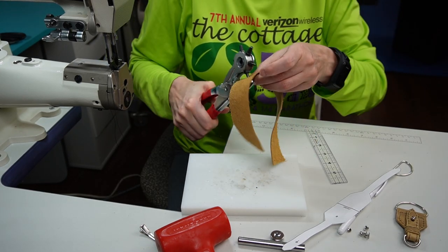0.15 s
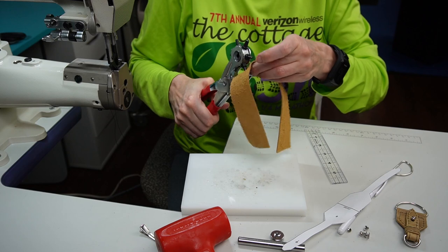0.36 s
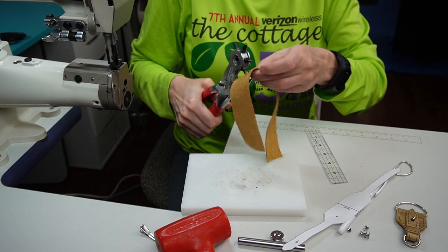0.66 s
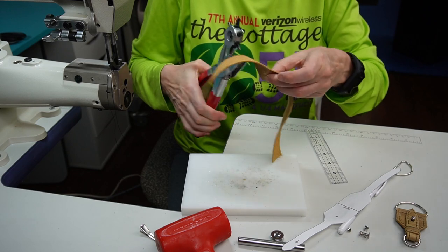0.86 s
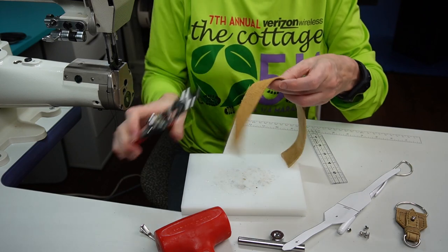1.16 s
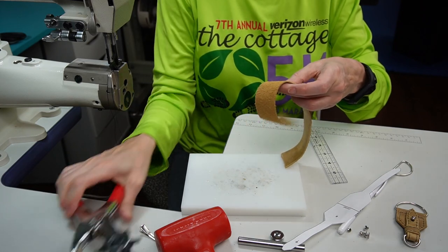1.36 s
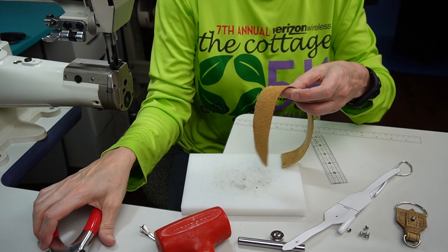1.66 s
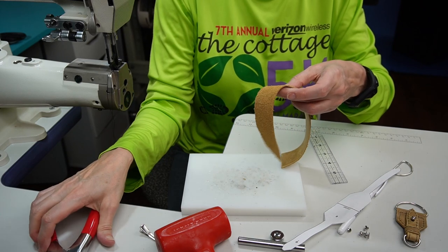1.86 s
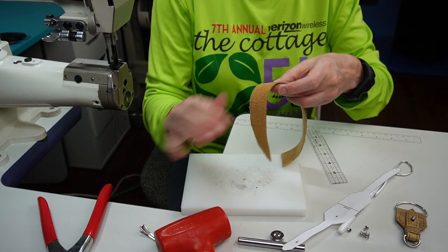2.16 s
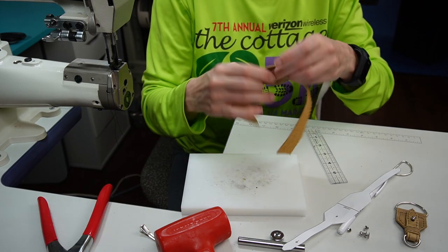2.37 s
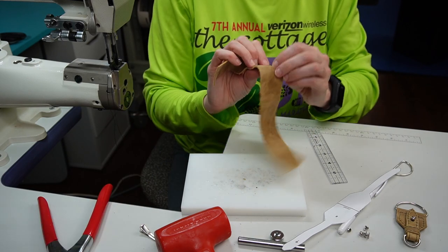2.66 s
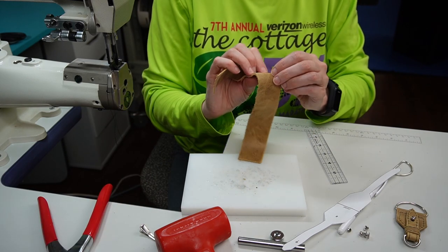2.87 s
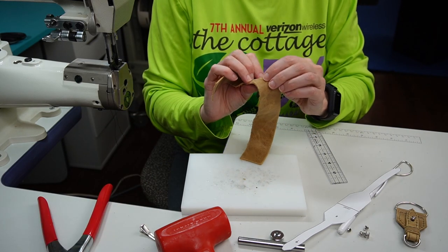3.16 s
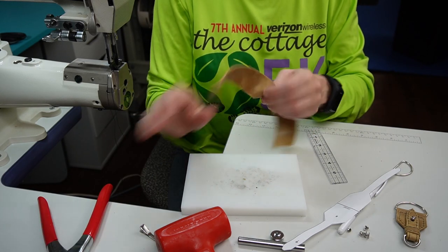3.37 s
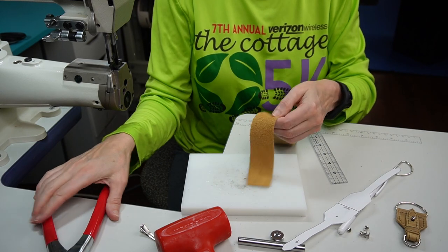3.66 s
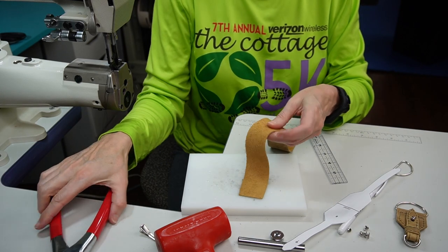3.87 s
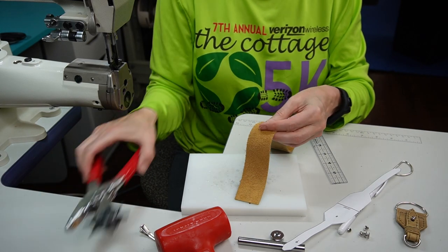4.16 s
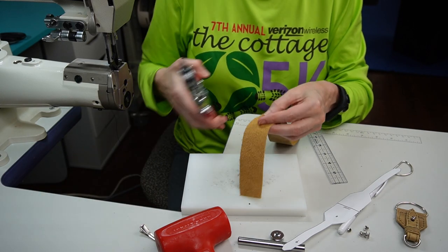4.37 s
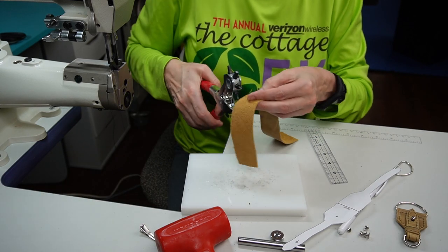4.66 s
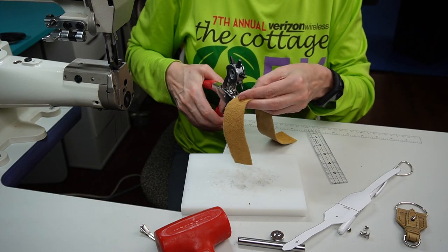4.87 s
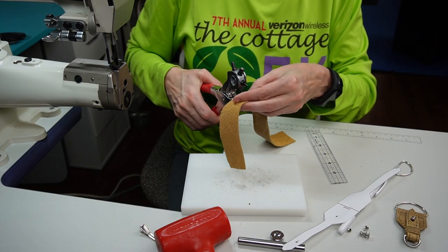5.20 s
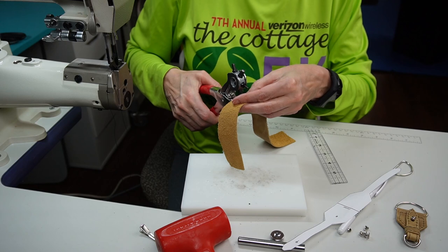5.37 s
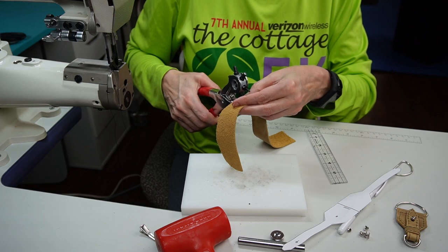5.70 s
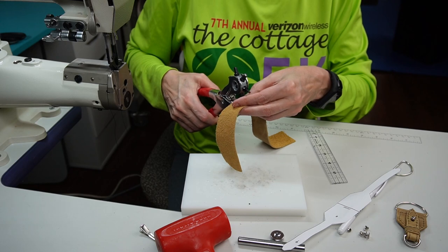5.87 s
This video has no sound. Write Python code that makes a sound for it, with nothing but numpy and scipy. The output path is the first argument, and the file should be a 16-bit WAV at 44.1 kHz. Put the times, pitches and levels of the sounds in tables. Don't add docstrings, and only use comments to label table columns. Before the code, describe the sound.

Steel punch pliers click free of leather, clatter down hard onto a tabletop, then after soft brushing are picked up and snap onto the strap.

```python
import sys
import numpy as np
from scipy import signal
from scipy.fft import rfft, irfft, next_fast_len
from scipy.io import wavfile

SR = 44100
rng = np.random.default_rng(int(sys.argv[2]) if len(sys.argv) > 2 else 0)


def voltage_ratio(decibels):
    exponent = np.asarray(decibels, float) / 20
    return 10 ** exponent


def dump(signal):
    limited = np.clip(np.atleast_2d(signal).T, -1, 1)
    pcm = np.round(limited * 32767).astype(np.int16)
    wavfile.write(sys.argv[1], SR, pcm)


N = 266187

# (frequency [Hz], density [dB per Hz])
AIR_COLOUR = [(13, -57), (22, -21.5), (116, -8), (141, -3), (213, -0.5), (266, -6.5), (381, -7.5), (463, -10),
              (1290, -15), (2370, -17), (2960, -18.5), (15200, -34), (16500, -43)]
# (time [s], level [dB])
DRAUGHT = [(0.0, -68.5), (0.57, -65.5), (1.11, -68), (2.2, -64), (2.82, -66.5), (4.89, -65.5), (5.61, -69),
           (6.04, -67)]
# (frequency [Hz], likeness [0-1])
AIR_ALIKE = [(60, 0.855), (180, 0.88), (550, 0.62), (1650, 0.53), (4970, 0.36), (15000, 0.029)]

# (frequency [Hz], t60 [s])
WALLS_T60 = [(100, 0.87), (400, 0.45), (2000, 0.53), (6000, 0.53), (14000, 0.27)]
# (frequency [Hz], likeness [0-1])
WALLS_ALIKE = [(100, 0.99), (600, 0.99), (2000, 0.86), (5000, 0.25), (14000, 0.064)]

# (frequency [Hz], density [dB per Hz])
CLOTH = [(710, -14), (1200, -4.5), (1700, -4), (3740, -1), (4550, -2.5), (10700, -6), (15000, -9),
         (16000, -14)]
# (peak time [s], level [dB], swell [dB per s], fade [dB per s])
STROKES = [(2.36, -85, 47, 61), (2.58, -64.5, 52, 196.5), (2.76, -71, 338, 340), (3.344, -53.5, 335, 440),
           (3.482, -66.5, 160, 191), (3.65, -66, 119, 103), (3.726, -58.5, 318, 897),
           (3.86, -61.5, 72, 55.5)]
# (peak time [s], level [dB], swell [dB per s], fade [dB per s])
STRAP_PULLS = [
    (2.6, -66, 68, 250),
    (4.86, -69, 30, 37),
]
# (time [s], centre [Hz])
STRAP_PITCH = [(2.45, 3020), (2.64, 4000), (4.65, 2533), (4.9, 2850), (5.1, 2850)]

# (frequency [Hz], width [Hz], level [dB])
HANDLE_MODES = [(148, 61, 8), (233, 13, -2), (338, 32, 9), (410, 33, 7.5), (496, 47, 5.5), (626, 66, 3.5),
                (847, 27, -3), (1300, 1200, -27), (1597, 143, 4), (2490, 180, -1), (2850, 160, -12)]
HEAD_MODES = [(123, 41, -1.5), (178, 43, -2), (298, 21, 1.5), (379, 35, -5.5), (453, 28, 3.5),
              (518, 80, -6.5), (642, 81, 7.5), (724, 44, -12), (961, 160, -12), (1078, 140, -0.5),
              (2090, 165, -10), (1546, 120, 3.5), (2320, 150, -9), (2900, 340, -8.5)]
# (frequency [Hz], width [Hz], level [dB])
PALM_MODES = [(152, 84, -8), (323.4, 19.5, 2.5), (518, 16, -8), (784, 240, -14)]
# (time [s], peak level [dB])
HANDLE_BLOWS = [
    (1.8855, -17),
    (1.914, -26.5),
    (1.9971, -23),
]
HEAD_BLOWS = [
    (2.027, -21),
    (2.0294, -3.5),
    (2.0316, -8.5),
    (2.0348, -7),
    (2.044, -20),
    (2.049, -18),
    (2.068, -20),
    (2.093, -24),
    (2.101, -24.5),
    (2.113, -26),
]
HAND_BLOWS = [(3.598, -41.5), (3.621, -48.5), (3.644, -47.5), (3.978, -46), (3.998, -44), (4.024, -56)]

# (frequency [Hz], level [dB], t60 [s])
STEEL = [(1990, -5.5, .25), (3473, 3, .07), (4460, -4.5, 0.39), (4990, -14, .08), (5890, -18.5, .12),
         (7250, -12, 0.097), (8500, -12, .04), (10400, -1, .05)]
# (time [s], peak level [dB],
# centre [Hz])
TICKS = [(.681, -59, 11000), (.729, -49.5, 10300), (.794, -54, 12000), (.803, -58, 11000),
         (.817, -57, 11000), (.84, -52, 12000), (3.415, -56, 8000), (3.622, -51, 11000),
         (3.664, -44.5, 3500), (3.707, -48, 5000), (4.528, -53.5, 10000), (4.539, -54, 9000),
         (4.584, -53, 10400), (4.72, -52, 13300), (4.735, -56, 12980), (5.0768, -41, 2600),
         (5.091, -54, 11500), (5.13, -54, 12500), (6.02, -55, 4500)]
# (time [s], peak level [dB], centre [Hz])
RATTLES = [(1.885, -24, 5150), (1.892, -31, 5400), (1.906, -41, 5800), (1.93, -47, 5500),
           (1.971, -36.5, 4900), (1.998, -35.5, 5970), (2.029, -22.5, 4220), (2.038, -27.5, 6000),
           (2.069, -36.5, 10000), (2.096, -38, 6900), (2.099, -28, 6000)]
# (time [s], peak level [dB], centre [Hz])
CLINKS = [(.3738, -46.5, 2000), (.727, -48, 3600), (1.2, -53.5, 4200), (1.249, -58, 5470),
          (4.404, -52, 4300), (4.4824, -45.5, 4800), (4.54, -56, 3900), (4.583, -49.5, 3900)]
# (time [s], peak level [dB], centre [Hz])
SCUFFS = [(3.285, -57.5, 2900), (3.312, -53, 4000), (3.336, -47.5, 3400), (3.342, -45.5, 3800),
          (3.35, -48, 2600), (3.38, -52, 3300)]
# (spread [octaves], t60 [s], ring level [dB])
TICK, RATTLE, CLINK, SCUFF = (0.52, 0.015, -35), (0.73, 0.031, -32), (0.36, 0.018, -18), (0.47, 0.051, -37)
# (centre [Hz], peak level [dB], spread [octaves], t60 [s], ring level [dB])
RELEASE = [(4330, -32, 0.3, 0.012, -33), (2340, -46, .35, 0.061, -30), (8000, -46, .56, .014, -30),
           (4300, -47.5, 0.61, 0.62, -30)]
PICKUP = [(4500, -36.5, 0.24, 0.013, -17), (3420, -42, 0.11, 0.017, -16), (7100, -43.5, 0.17, .02, 3),
          (11000, -39, .4, .015, -5), (6000, -50, 0.88, 0.46, -23)]
BITE = [(10980, -36, 0.13, .016, -22), (14560, -38, 0.36, 0.0081, -32), (2600, -37.5, 0.46, 0.02, -43),
        (1890, -41, 0.12, 0.017, -5), (6000, -48, 0.54, 0.01, -30), (2600, -57, .8, .4, -30)]
RELEASE_S, PICKUP_S, BITE_S = 0.7635, 4.3252, 5.072


def unit(x):
    return x / np.sqrt(np.mean(x ** 2) + 1e-20)


def along(points, hz):
    f, value = np.transpose(points)
    return np.interp(np.log(hz + 1), np.log(f + 1), value)


def curve(rows):
    s, value = np.transpose(rows)
    return np.interp(np.arange(N) / SR, s, value)


def filtered(x, response):
    n = x.shape[-1]
    size = next_fast_len(n + 8192)
    return irfft(rfft(x, size) * response(np.fft.rfftfreq(size, 1 / SR)), size)[..., :n]


def paired(pair, alike, spectrum=((1, 0),)):
    def mid_side_gain(hz):
        turn = np.arccos(np.clip(along(alike, hz), -1, 1)) / 2
        return voltage_ratio(along(spectrum, hz)) * [np.cos(turn), np.sin(turn)]

    mid, side = filtered(pair, mid_side_gain)
    return np.array([mid + side, mid - side])


def add(track, s, sound):
    start = round(s * SR)
    track[start:][:len(sound)] += sound[:N - start]


def strokes(rows):
    t = np.arange(N) / SR
    gain = np.zeros(N)
    for s, db, swell, fade in rows:
        gain += voltage_ratio(db - np.where(t < s, swell * (s - t), fade * (t - s)))
    return gain


def ports(x, lead_us, pan_db):
    sides = np.array([[1], [-1]])
    return filtered(x * voltage_ratio(sides * pan_db / 2), lambda hz: np.exp(1j * np.pi * hz * lead_us * 1e-6 * sides))


def air():
    noise = unit(paired(rng.standard_normal((2, N)), AIR_ALIKE, AIR_COLOUR))
    rumble = filtered(noise, lambda hz: 1 / (1 + (hz / 400) ** 4))
    return voltage_ratio(-60) * (noise - rumble) + voltage_ratio(curve(DRAUGHT) + 7) * rumble


def walls(x):
    out, step = np.zeros((2, N + SR)), SR // 20
    for i in range(0, N, step):
        piece = x[None, i:i + step]
        if np.abs(piece).max() <= voltage_ratio(-66):
            continue
        hz, t, z = signal.stft(rng.standard_normal((2, SR * 2 // 3)), SR, nperseg=256)
        decay = voltage_ratio(-60 * t / along(WALLS_T60, hz)[:, None])
        tail = signal.istft(z * decay, SR, nperseg=256)[1]
        tail = tail * np.clip(np.arange(tail.shape[1]) / SR / 0.007, 0, 1)
        wet = signal.fftconvolve(piece, tail / np.linalg.norm(tail[0]), axes=1)
        out[:, i:i + wet.shape[1]] += wet
    return paired(out[:, :N], WALLS_ALIKE, [(100, 1), (5000, 0.19), (12000, 0.79)])


def brushing():
    grain = rng.standard_normal(N) * voltage_ratio(5.2 * rng.standard_normal(N))
    return voltage_ratio(-1) * strokes(STROKES) * unit(filtered(grain, lambda hz: voltage_ratio(along(CLOTH, hz))))


def strap_slide():
    a, b = filtered(rng.standard_normal((2, N)), lambda hz: 1 / (1 + (hz / 260) ** 2))
    phase = 2 * np.pi * np.cumsum(curve(STRAP_PITCH)) / SR
    return strokes(STRAP_PULLS) * unit(a * np.cos(phase) + b * np.sin(phase))


def thud(contact_ms, modes):
    t_ms = np.arange(SR // 4) / SR * 1000
    push = np.sin(np.pi * np.minimum(t_ms / contact_ms, 1)) ** 2
    spot_db = rng.normal(0, 1.5, 20)

    def top(f):
        return sum(voltage_ratio(db + spot) * 1j * f * width / (hz * hz - f * f + 1j * f * width)
                   for (hz, width, db), spot in zip(modes, spot_db))

    def radiation(f):
        return (1j * f / 150 / (1 + 1j * f / 150)) ** 3

    sound = filtered(filtered(push, top), radiation)
    return sound / np.abs(sound).max()


def table():
    out = np.zeros(N)
    softer = 0.25
    for blows, modes, hard_ms in ((HANDLE_BLOWS, HANDLE_MODES, 0.51),
                                  (HEAD_BLOWS, HEAD_MODES, 0.46),
                                  (HAND_BLOWS, PALM_MODES, 1.6)):
        hardest_db = max(db for s, db in blows)
        for s, db in blows:
            add(out, s, voltage_ratio(db) * thud(hard_ms * voltage_ratio(hardest_db - db) ** softer, modes))
    return out


def touches():
    contacts = []
    for rows, kind in ((TICKS, TICK), (RATTLES, RATTLE), (CLINKS, CLINK), (SCUFFS, SCUFF)):
        contacts += [(*row, *kind) for row in rows]
    for s, zones in ((RELEASE_S, RELEASE), (PICKUP_S, PICKUP), (BITE_S, BITE)):
        contacts += [(s, db, hz, *rest) for hz, db, *rest in zones]
    return contacts


def pliers():
    out, t = np.zeros(N), np.arange(SR // 3) / SR
    for s, db, centre, octaves, t60, ring_db in touches():
        def near(f):
            return np.exp(-0.5 * (np.log2((f + 1) / centre) / octaves) ** 2)

        spray = filtered(rng.standard_normal(len(t)), near)
        spray = spray * voltage_ratio(-60 * t / t60) * (1 - np.exp(-t / 0.0005))
        spray = spray / np.abs(spray).max()
        ring = np.zeros(len(t))
        for f, mode_db, life in STEEL:
            level = near(f) * voltage_ratio(mode_db + rng.normal(0, 1.44) - 60 * t / life)
            ring += level * np.sin(2 * np.pi * f * t)
        flutter = unit(filtered(rng.standard_normal(len(t)), lambda f: 1 / (1 + (f / 60) ** 2)))
        ring = ring * (1 + 0.75 * flutter)
        add(out, s, voltage_ratio(db) * (spray + voltage_ratio(ring_db) * ring))
    return out


def scene():
    top, steel, soft = table(), pliers(), brushing() + strap_slide()
    t = np.arange(N) / SR
    on_table = (t >= 1.5) & (t <= 4.2)
    lying, held = steel * on_table, steel * ~on_table
    near = ports(top + lying, lead_us=17, pan_db=0.3) + ports(held + soft, lead_us=14, pan_db=-0.6)
    screened = filtered(held, lambda hz: voltage_ratio(-8.5) / (1 + (hz / 7000) ** 2))
    to_walls = voltage_ratio(-5) * top + voltage_ratio(-8.5) * lying + screened + voltage_ratio(-4.5) * soft
    return near + walls(to_walls) + air()


def roll_off(x):
    return signal.sosfilt(signal.butter(12, 16810, fs=SR, output="sos"), x)


def record(dry):
    mix = filtered(dry, lambda hz: 1 / (1 + (hz / 16300) ** 60))
    return roll_off(mix)


dry = scene()
out = record(dry)
dump(out)
```